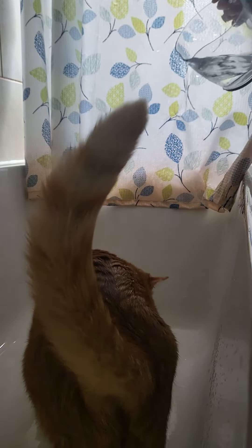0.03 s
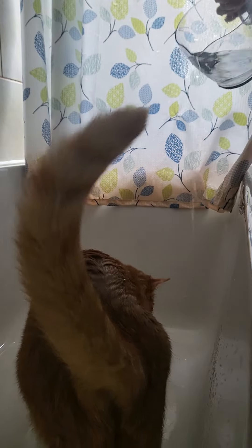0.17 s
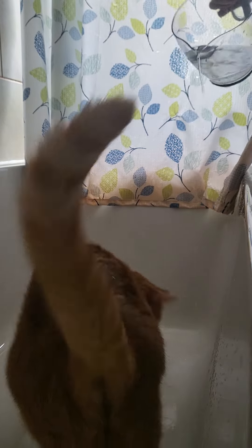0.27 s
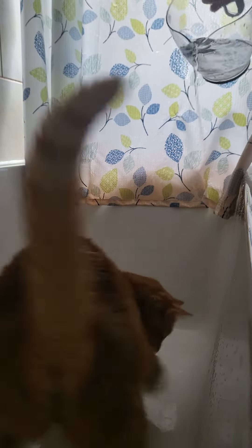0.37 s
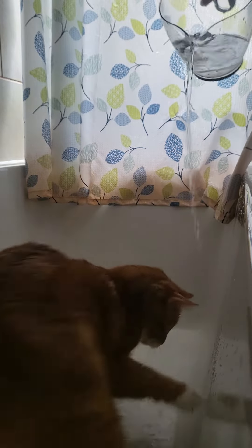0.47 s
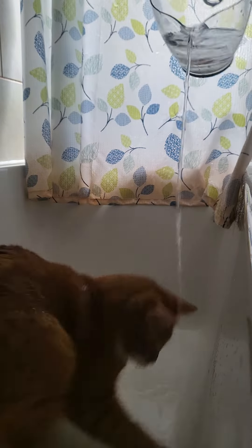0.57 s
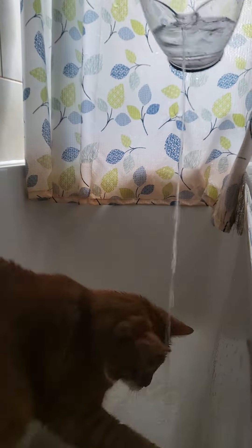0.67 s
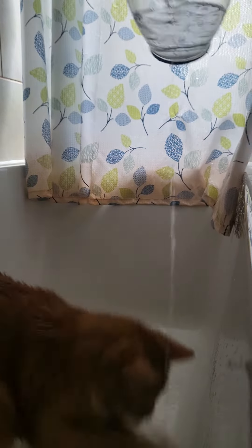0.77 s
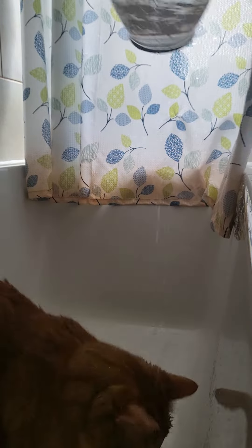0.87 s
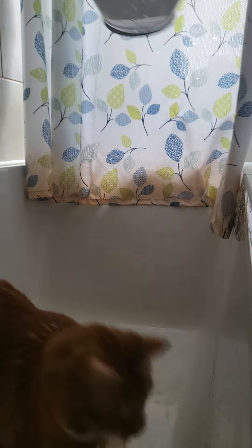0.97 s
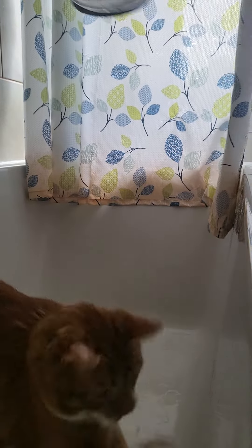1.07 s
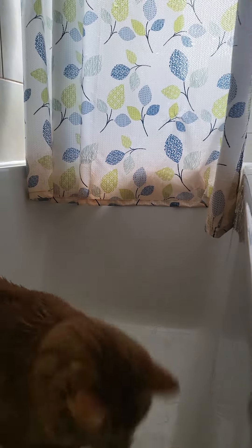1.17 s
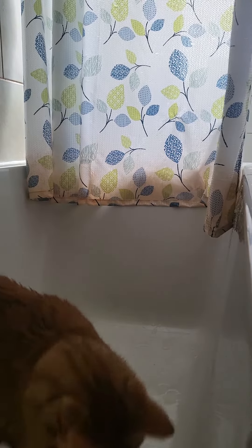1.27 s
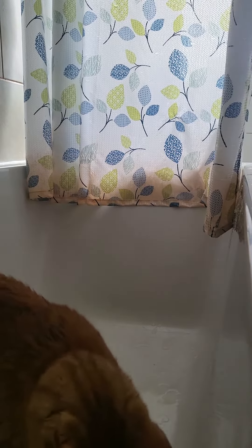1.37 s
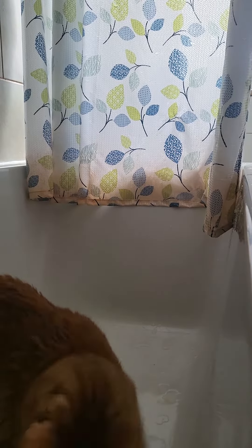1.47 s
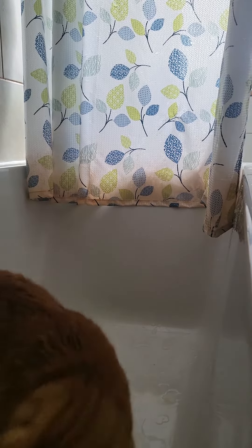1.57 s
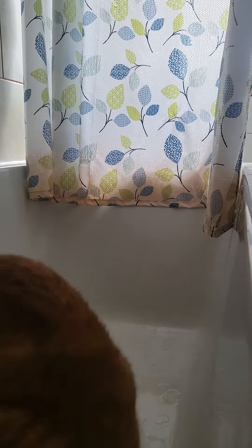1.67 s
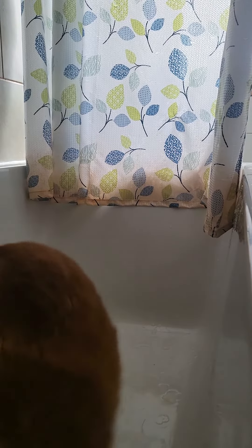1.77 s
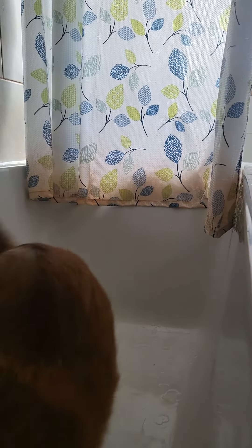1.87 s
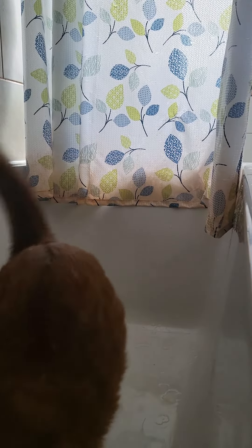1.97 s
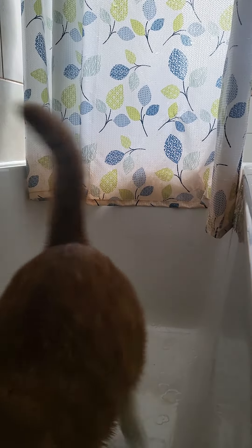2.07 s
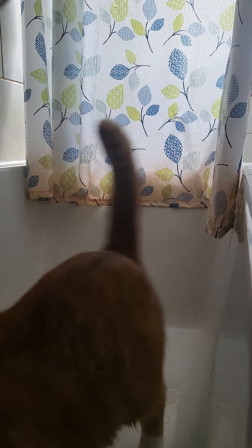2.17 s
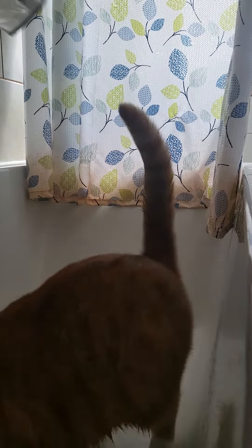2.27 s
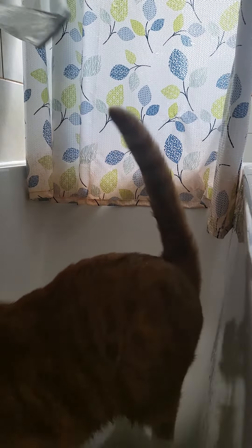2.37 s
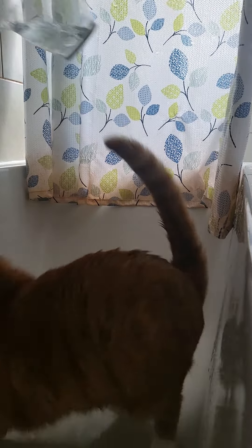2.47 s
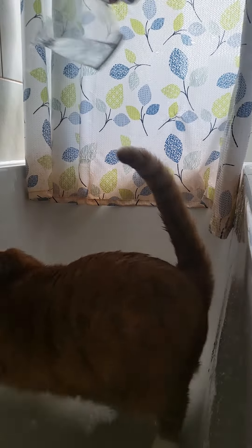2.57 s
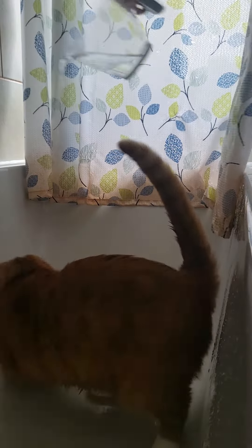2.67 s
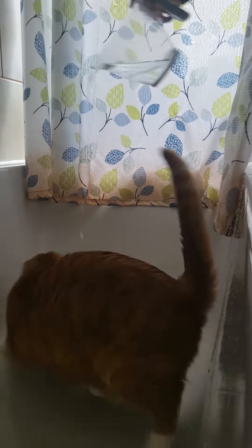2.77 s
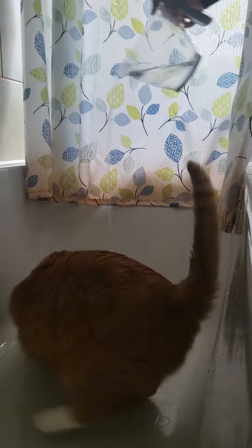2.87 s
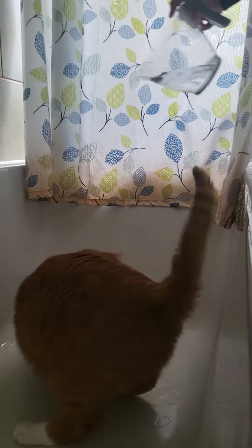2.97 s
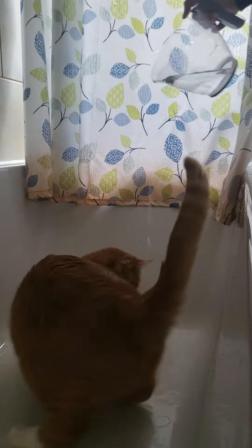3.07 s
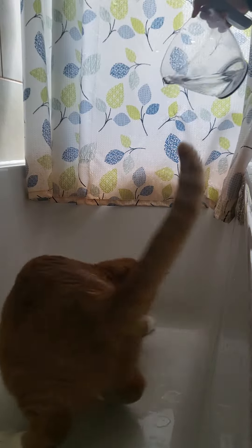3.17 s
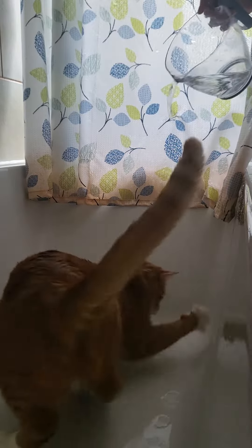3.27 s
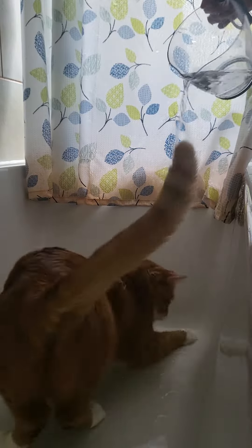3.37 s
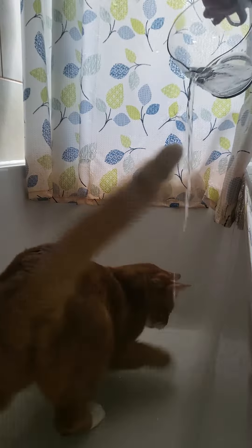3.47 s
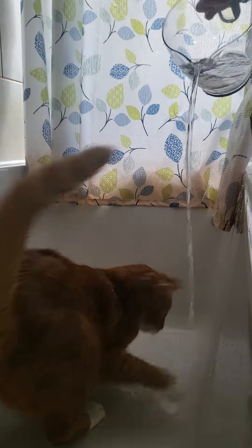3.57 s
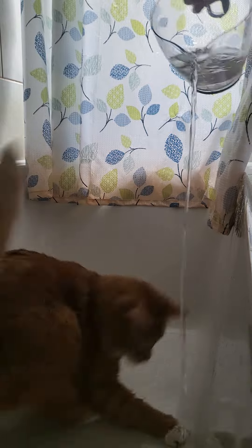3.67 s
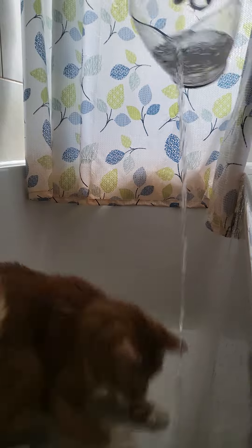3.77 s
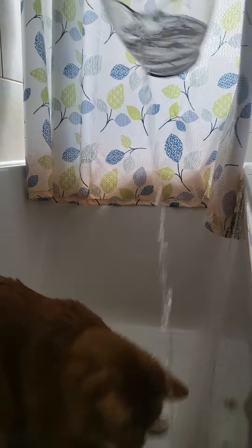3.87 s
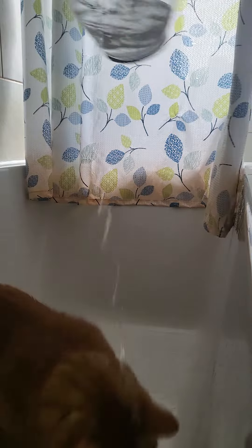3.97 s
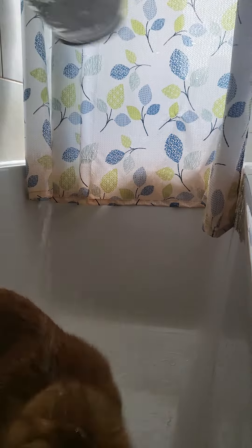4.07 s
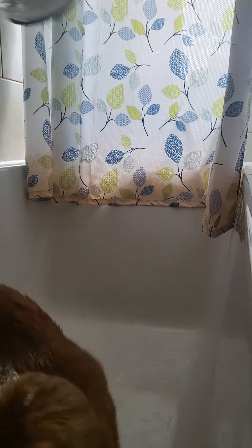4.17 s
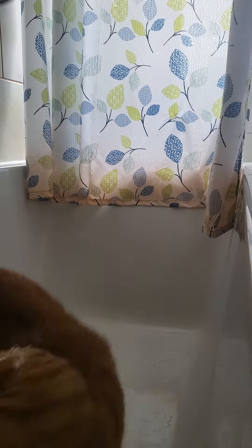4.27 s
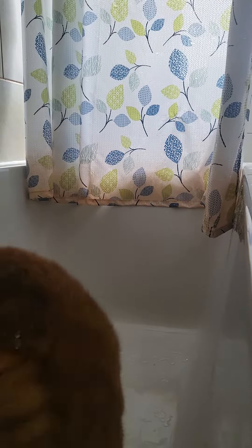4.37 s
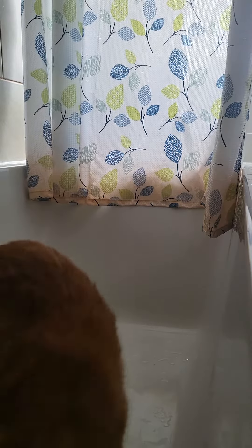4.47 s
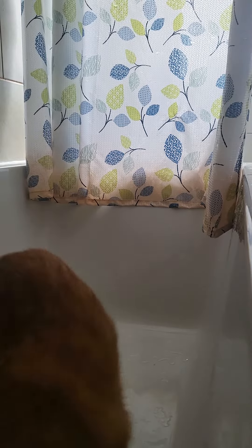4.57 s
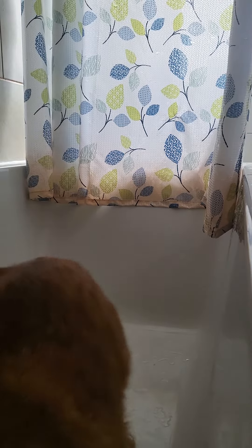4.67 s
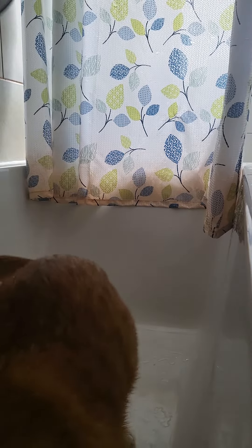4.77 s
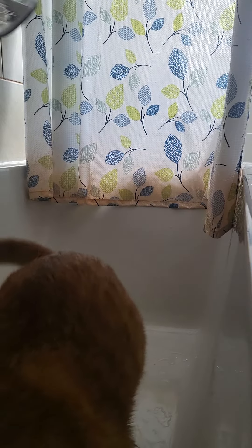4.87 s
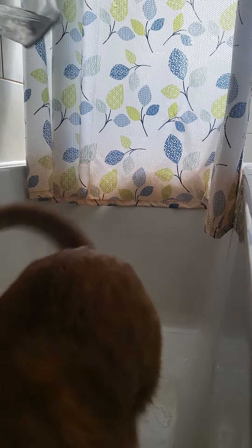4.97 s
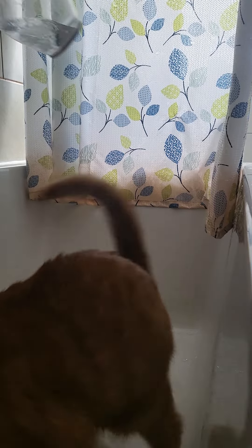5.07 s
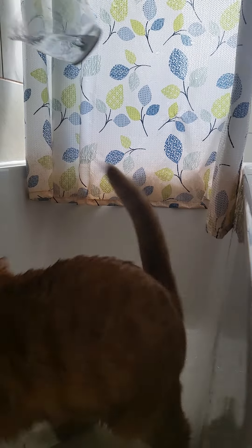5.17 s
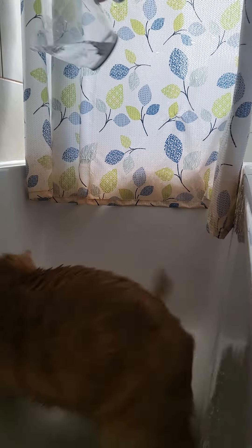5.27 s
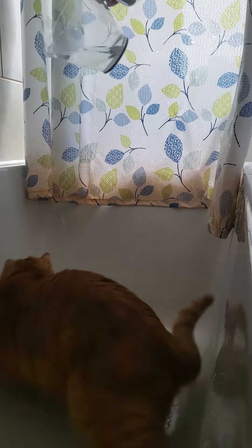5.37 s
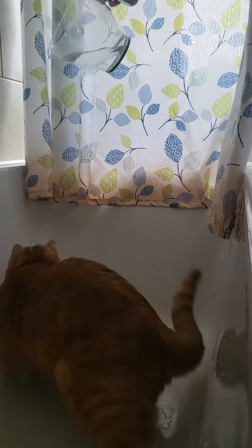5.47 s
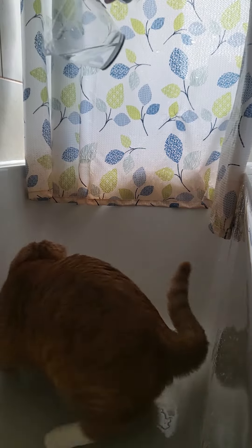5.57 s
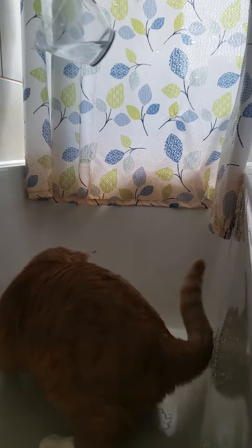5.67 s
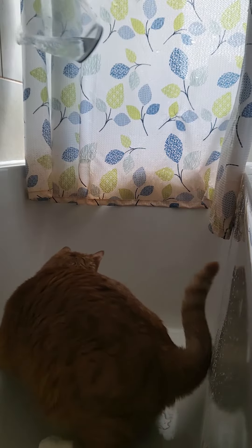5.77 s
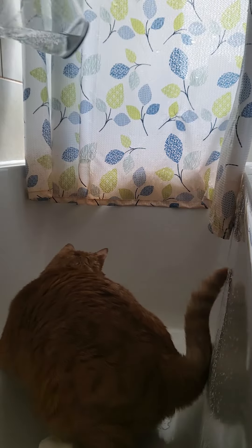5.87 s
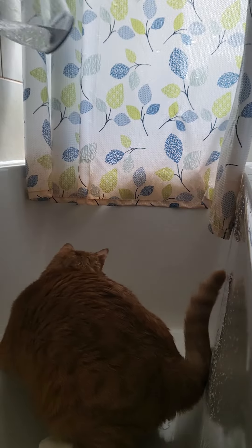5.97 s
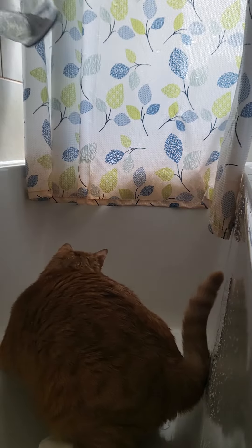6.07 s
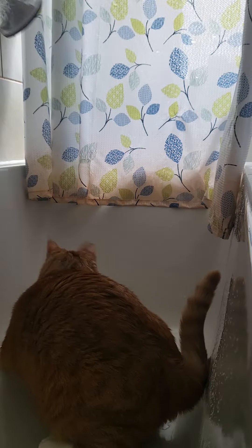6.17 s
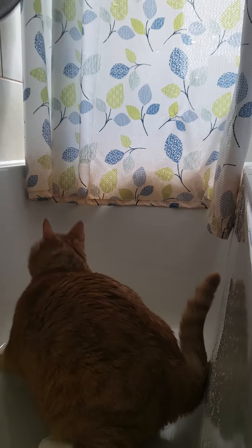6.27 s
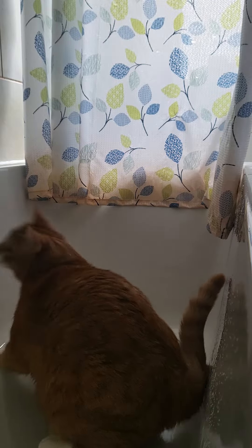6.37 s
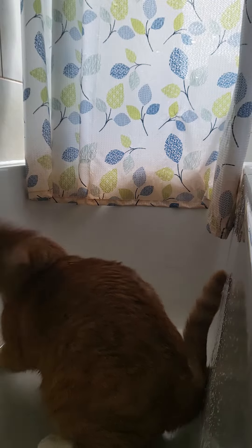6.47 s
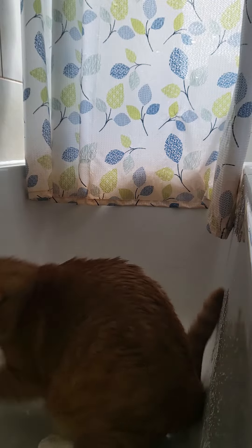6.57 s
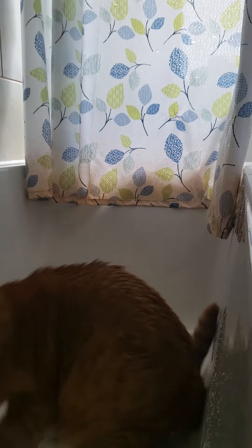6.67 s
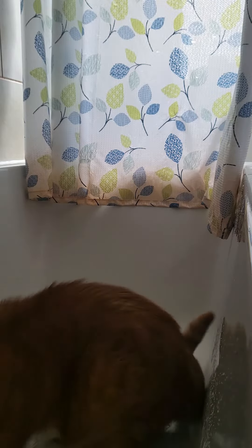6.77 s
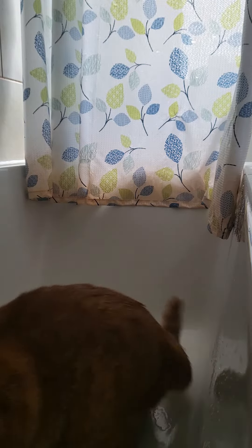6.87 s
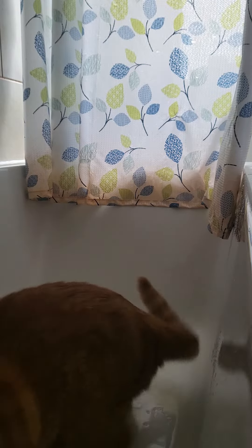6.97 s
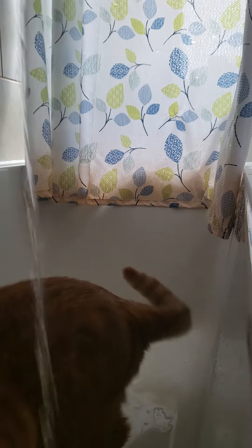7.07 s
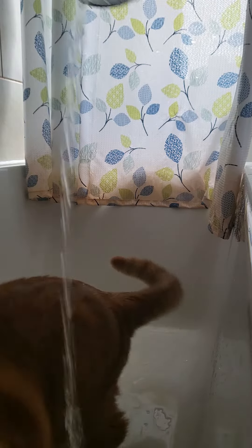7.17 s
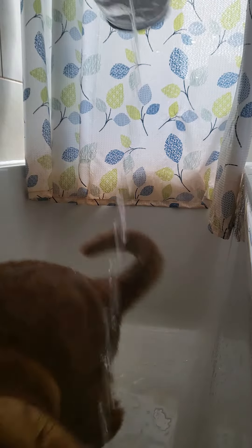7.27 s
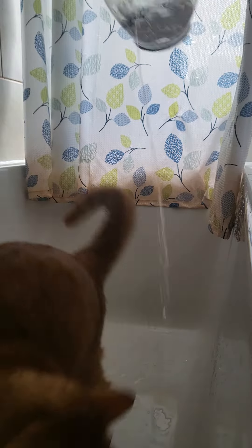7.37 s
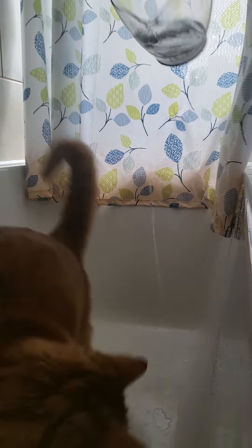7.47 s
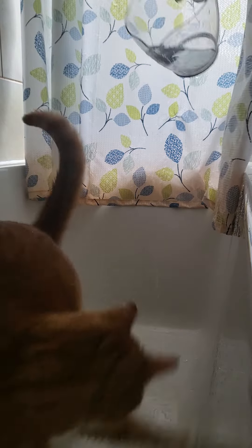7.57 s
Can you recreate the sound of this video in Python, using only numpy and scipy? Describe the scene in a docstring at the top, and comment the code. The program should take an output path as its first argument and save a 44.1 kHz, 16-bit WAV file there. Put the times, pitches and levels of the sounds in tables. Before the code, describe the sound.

Water spatters in brief bursts onto a wet bathtub floor while a cat's paws thump it, each hit ringing dull and hollow.

```python
"""Water is tipped from a glass into a bathtub in several short pours while a cat paws at the stream and treads about.
Slugs of water slap the wet floor as bursts of coloured noise; droplets tick and air pockets plop as short pings.
The hollow tub drums and booms under water and paws: decaying sine tones and dull noise.
The tiled alcove rings briefly through fading noise echoes; a faint hum and low air noise sit in the room."""
import sys
import numpy as np
from scipy import signal
from scipy.fft import rfft, irfft, next_fast_len
from scipy.io import wavfile
from scipy.ndimage import uniform_filter1d, map_coordinates

SR = 44100
rng = np.random.default_rng(int(sys.argv[2]) if len(sys.argv) > 2 else 0)


def dump(signal):
    """Clip the signal to [-1, 1] and save it as 16-bit WAV at the path in sys.argv[1]."""
    limited = np.clip(np.atleast_2d(signal).T, -1, 1)
    pcm = np.round(limited * 32767).astype(np.int16)
    wavfile.write(sys.argv[1], SR, pcm)


N = 336469  # length [samples]
T = np.arange(SR // 2) / SR  # time since a blow [s]
TOP_HZ = 16100  # nothing above this is kept

# Levels and balances in the tables are relative: the functions add their own gains.
# Room air noise: (frequency [Hz], level per Hz [dB])
AIR_SPECTRUM = [(12, -46.5), (20, -9.5), (63, 6), (158, -17.5), (172, -19.5), (187, -14.5), (270, -17),
                (319, -24), (399, -10.5), (434, -34), (472, -31), (850, -38), (1700, -47), (6500, -53),
                (10000, -45), (14500, -50), (16000, -52)]
# Steady hum tones: (frequency [Hz], rms level [dB])
HUM_TONES = [(70, -61), (394, -69.5)]
# How alike left and right are in diffuse sound: (frequency [Hz], likeness [0 to 1])
LIKENESS = [(60, .92), (110, 0.19), (200, .82), (380, 0.58), (700, 0.79), (1300, 0.064)]
# How long the tiled alcove rings: (frequency [Hz], time to fall 60 dB [s])
ALCOVE_DECAY = [(100, .4), (300, 0.32), (800, 0.15), (2000, 0.22), (5000, 0.24), (10000, 0.17),
                (16000, 0.17)]
LEFT_LEAD_S = 0.0004224  # direct sound reaches the left microphone this much before the right

# Single droplets that stand out of the patter: (time [s], peak level [dB], starting pitch [Hz])
DROPS = [(0.2344, -41.5, 9100), (0.2858, -45.5, 9300), (0.3392, -41.5, 4370), (0.4344, -37.5, 4190),
         (0.6235, -31, 4500), (0.6559, -34.5, 14400), (0.7233, -25, 10000), (0.9857, -51.5, 4450),
         (1.6347, -34.5, 6830), (1.6985, -29.5, 10700), (1.8131, -34, 5050), (2.1331, -33.5, 4500),
         (2.2223, -39.5, 6150), (2.2802, -38, 6300), (2.3984, -45, 3090), (2.7886, -33.5, 7250),
         (3.5404, -27, 7000), (3.5563, -25.5, 4900), (3.6187, -28.5, 6470), (4.0462, -37.5, 4500),
         (4.114, -36.5, 6900), (4.45, -50, 5600), (4.511, -39.5, 5600), (4.6503, -38, 2660),
         (4.6992, -32.5, 5600), (5.025, -35, 3300), (5.79, -60, 6000), (6.4268, -46, 13530),
         (6.4906, -41.5, 12100), (6.561, -46.5, 13600), (6.7211, -35.5, 14800), (6.7411, -30.5, 2920),
         (6.9591, -27, 3940), (7.2345, -28, 6300), (7.3652, -22.5, 11500), (7.43, -24, 11400)]
DROP_TILT = 3  # a droplet's tick brightens by this for each octave of its pitch [dB/octave]
# Stray droplets in running water: how many, peak over the spatter, and scatter of that peak
STRAY_PER_S, STRAY_DB, STRAY_SPREAD_DB = 9.8, 19, 4
STRAY_HZ, STRAY_OCTAVES = 5500, 0.68  # their middle pitch and its scatter

# Spells of running or dribbling water: (start [s], length [s], spatter [dB], splashing [dB],
# drumming on the tub [dB], fine hiss [dB])
RUNS = [(0.279, .09, -70, -69, -46, -75), (0.598, 0.23, -59, -57.5, -34.5, -61.5),
        (1.485, 0.12, -59, -59, -39, -55), (1.621, .15, -56.5, -53, -38, -52.5),
        (1.84, .2, -64.5, -66.5, -42.5, -68), (2.152, 0.17, -74.5, -71.5, -42.5, -76.5),
        (2.5, .1, -73, -79.5, -50, -77), (2.677, 0.23, -50, -53, -35, -53), (3.02, .27, -57, -56, -42, -61),
        (3.606, 0.29, -51, -47.5, -30, -52), (4.011, 0.2, -60.5, -57, -33.5, -65.5),
        (4.58, .09, -58, -54.5, -36, -62), (4.823, 0.119, -69, -70.5, -44, -75.5),
        (5.082, 0.25, -73.5, -59, -36.5, -77), (5.308, 0.16, -61.5, -50, -32, -74.5),
        (6.508, 0.1, -70, -58, -39.5, -56), (6.796, 0.42, -51, -47.5, -33, -50.5),
        (7.27, 0.22, -51.5, -47, -32.5, -52)]
RUN_ATTACK_S, RUN_SAG_DB_PER_S = 0.046, 8  # a run swells up to its start, then thins as it flows
# Time to fall 60 dB once the flow stops [s]
SPATTER_T60, SPLASHING_T60, DRUMMING_T60, HISS_T60 = 0.26, 0.32, 0.65, 0.35
SPURT_PER_S, SPURT_DB = 45, 2.5  # the falling stream breaks into uneven spurts: rate and scatter
# Bright spatter of drops: (frequency [Hz], level per Hz [dB])
SPATTER_SPECTRUM = [(900, -15.5), (2200, -7.5), (3300, -2.5), (4800, -2), (8000, -1), (10500, -1),
                    (13000, -4.5), (16000, -8)]
# Deeper splashing in the puddle: (frequency [Hz], level per Hz [dB])
SPLASHING_SPECTRUM = [(200, -33), (450, 11), (700, -2), (1100, -3.5), (1700, -11), (2500, -13.5),
                      (5000, -33), (16000, -65.5)]
# Finest spray: (frequency [Hz], level per Hz [dB])
HISS_SPECTRUM = [(3000, -29), (7000, -9), (10500, -0.5), (13000, -1), (16000, -3.5)]

# Paws treading on the tub, with no splash: (time [s], knock [dB], knock tilt [dB/octave], boom [dB])
STEPS = [(0.329, -49, 4.5, -42), (0.439, -42, 1, -45), (0.599, -26.5, -6.5, -35), (0.68, -28.5, -2.5, -35),
         (1.661, -23, -5.5, -37.5), (1.81, -30, -3, -23), (2.239, -28.5, 0, -40), (2.496, -34.5, 0, -37.5),
         (3.995, -16.5, -6.5, -22.5), (5.203, -28, -3, -34.5), (5.35, -22.5, 4, -37),
         (5.449, -27, 3, -27.5), (6.973, -25, 1, -35), (7.336, -21.5, 3.5, -35)]
# Modes (ringing tones) of the tub shell above its lowest one:
# (frequency [Hz], level [dB], time to fall 60 dB [s])
TUB_MODES = [(90.5, 2, 0.28), (114, 3.5, 0.3), (147, -0.5, 0.47), (159.5, -6.5, .25), (212, -12, 0.82),
             (267.8, -5.5, 0.27), (278.2, 2, 0.23), (348, -2.5, 0.16), (402.7, -7.5, .24),
             (443, -13.5, 0.18), (537, -15.5, 0.22)]
# Dull blur of the shell's weaker modes: (frequency [Hz], level per Hz [dB])
SHELL_SPECTRUM = [(30, -41.5), (80, 5.5), (120, 6.5), (200, 2), (290, -6.5), (420, -10), (600, -19),
                  (900, -25.5), (2000, -58.5), (6000, -100)]
BOOM_HZ, BOOM_T60 = 65.42, 0.54  # the tub floor flexing as a whole: pitch, time to fall 60 dB [s]
KNOCK_LAG_S = 0.003  # the tub gives way just after a splash

# Slugs of water and wet paws landing; each smacks, throws spray and shakes the tub:
# (time [s], left-right balance [dB], smack [dB], smack tilt [dB/octave], spray [dB],
# spray tilt [dB/octave], spray delay [s], knock [dB], knock tilt [dB/octave], boom [dB])
SPLASHES = [(0.555, -3.5, -32.5, 1.5, -65.5, 1.5, .001, -48, 9, -55),
            (0.581, 2, -30.5, 5, -31.5, -5, .001, -26, 1, -36),
            (0.793, -0.5, -18, 5, -22, -1, .001, -25.5, 4.5, -29),
            (0.835, 9, -34.5, -11, -46.5, -2, .001, -27.5, 5, -36.5),
            (1.314, -1.5, -31.5, 6, -39.5, -4, .004, -37.5, 7.5, -40),
            (1.433, -11, -29.5, -6.5, -48.5, 5, .001, -31, 1, -47),
            (1.58, 10.5, -32, 1, -50.5, 7.5, .001, -46, -4, -52),
            (1.773, -6, -39, 2.5, -43.5, 5, .001, -31.5, 2.5, -52),
            (2.025, -11, -41, 5.5, -46.5, -5.5, .001, -46, 5, -35.5),
            (2.627, 1, -20, -0.5, -29, 3, .001, -7, 0, -41),
            (2.651, -3.5, -19.5, -3, -35, -3.5, .004, -18.5, 3, -25.5),
            (2.827, -5.5, -24.5, 5.5, -29, -3.5, .004, -17.5, -3, -28),
            (2.897, -1.5, -28, 3.5, -32, -2, .001, -22, 0, -27.5),
            (3.007, 11, -22.5, 1.5, -59.5, -3, .001, -31, 10, -55),
            (3.156, 2, -21, -1.5, -40, 0, .001, -20, 3.5, -37),
            (3.331, 11, -27.5, 1.5, -33.5, -1.5, .014, -24, 0, -36),
            (3.635, 3, -20, -2.5, -31, -3, .013, -23.5, 0, -36),
            (3.783, 10.5, -26.5, -4, -31.5, 5, .001, -8, -0.5, -23),
            (3.832, -6, -15.5, 0, -41, -7, .001, -17.5, 3, -31),
            (3.974, 0, -14.5, 0.5, -30.5, -3, .001, -10, 4, -33),
            (4.153, -5.5, -22.5, 4, -38, 3, .008, -23, 1.5, -27),
            (5.285, 0, -27.5, -1, -33, 2.5, .001, -14, -0.5, -30),
            (5.321, -4, -28, 8, -30, 2, .007, -36, 8, -36.5),
            (6.79, 4.5, -25, 4.5, -25, 5, .003, -14.5, -4, -18.5),
            (6.842, 6.5, -51, -5, -26.5, 0.5, .002, -20, -8, -29),
            (7.106, 9.5, -20, 1, -34, 2.5, .001, -34, -6, -30),
            (7.117, 0.5, -20, -8, -30, 2, .001, -18.5, -14, -27.5),
            (7.305, -4, -26.5, 3, -28, 1, .013, -28, 1, -48),
            (7.562, 9.5, -12, -3, -43.5, -1, .001, -18.5, -1, -32),
            (7.592, 3, -28, -4, -39.5, -4, .001, -32, -12, -43)]
# Hollow smack of water on the floor: (frequency [Hz], level per Hz [dB])
SLAP_SPECTRUM = [(150, -24), (400, 3.5), (700, 1), (1100, 2), (1400, 1.5), (1800, -7.5), (2200, -14),
                 (3200, -19.5), (6000, -26.5), (16000, -53)]
# Bright spray thrown by a slug: (frequency [Hz], level per Hz [dB])
SPRAY_SPECTRUM = [(700, -31), (1800, 0), (2800, 2.5), (4800, 0), (6500, -3), (8200, -9), (10000, -6),
                  (13000, -13), (16000, -20.5)]
# A slug's front: head start [s], level against its spray, time to fall 60 dB [s]
LEAD_S, LEAD_DB, LEAD_T60 = 0.0092, -10, 0.025
# Droplets flung up by a splash land again: rate, level against the spray, time to fall 60 dB [s]
REBOUND_PER_S, REBOUND_DB, REBOUND_T60 = 70, -17.5, 0.21
# The largest air pockets gulping in the water: (time [s], level [dB], starting pitch [Hz])
GLUGS = [(0.585, -31, 1680), (0.796, -20, 1780), (1.432, -39, 1370), (3.014, -28, 230), (3.654, -27, 1750),
         (3.854, -23.5, 548), (3.9734, -23, 1550), (3.801, -26.5, 370), (4.6, -43.5, 1890),
         (4.925, -54, 1330), (5.322, -31, 876), (5.37, -28, 354), (5.401, -31.5, 457), (5.447, -35.5, 610),
         (6.98, -38, 403), (7.15, -36, 697), (7.352, -36, 426)]


def amp(db):
    """Decibels to gain."""
    return 10 ** (np.asarray(db) / 20)


def unit(x):
    """Scaled to rms (average strength) 1."""
    return x / np.sqrt(np.mean(x ** 2) + 1e-20)


def crest(x, size):
    """Scaled so that the loudest stretch of size samples has rms 1."""
    power = np.mean(np.atleast_2d(x) ** 2, axis=0)
    return x / np.sqrt(uniform_filter1d(power, size).max() + 1e-20)


def along(points, hz):
    """(Hz, value) points joined by lines on a log frequency axis."""
    f, v = np.transpose(points)
    return np.interp(np.log(hz + 1), np.log(f), v)


def fade(t, t60):
    """Exponential decay that falls 60 dB in t60 seconds."""
    return np.exp(-np.log(1000) * t / t60)


def sides(db):
    """Left and right gains for a level difference; positive means louder on the left."""
    return amp(np.array([[db], [-db]]) / 2)


def add(track, s, sound):
    """Mix a sound in at time s."""
    part = track[..., max(round(s * SR), 0):][..., :sound.shape[-1]]
    part += sound[..., :part.shape[-1]]


def filtered(x, response):
    """x with its spectrum multiplied by a response of frequency."""
    n = x.shape[-1]
    m = 2 * next_fast_len(n // 2 + n // 16 + 512)  # spare room for the filter's ringing
    hz = np.fft.rfftfreq(m, 1 / SR)
    return irfft(rfft(x, m) * response(hz), m)[..., :n]


def coloured(x, spectrum):
    """x shaped to a spectrum by a filter of unit power gain that never sounds early."""
    def response(hz):
        # folding the cepstrum gives the filter with the least delay (minimum phase)
        cepstrum = irfft(np.log(unit(amp(along(spectrum, hz)))))
        half = len(cepstrum) // 2
        cepstrum[1:half] *= 2
        cepstrum[half + 1:] = 0
        return np.exp(rfft(cepstrum))
    return filtered(x, response)


def tilted(spectrum, tilt_db, pivot_hz):
    """A spectrum brighter or duller by tilt_db an octave, up to two octaves from the pivot."""
    return [(hz, db + tilt_db * np.clip(np.log2(hz / pivot_hz), -2, 2)) for hz, db in spectrum]


def diffuse(pair):
    """Two unrelated signals become left and right, as alike at each pitch as LIKENESS says."""
    def mid_side_gains(hz):
        turn = np.arccos(np.clip(along(LIKENESS, hz), 0, 1)) / 2
        return np.array([np.cos(turn), np.sin(turn)])
    mid, side = filtered(pair, mid_side_gains)
    return np.array([mid + side, mid - side])


def direct(x, pan_db):
    """A sound from the tub floor as two microphones hear it: the left one first."""
    ear = np.array([[1], [-1]])
    return sides(pan_db) * filtered(x, lambda hz: np.exp(1j * np.pi * hz * LEFT_LEAD_S * ear))


def impacts(rate, spread_db):
    """Randomly timed impulses of uneven size and random sign, rms 1."""
    hit = rng.random(N) < rate / SR
    size = amp(spread_db * np.minimum(rng.standard_normal(N), 2))
    return unit(hit * size * rng.choice([-1, 1], N))


def room_tone():
    """Low air noise and a faint hum whose phase wanders slightly."""
    t = np.arange(N) / SR
    drift = map_coordinates(rng.standard_normal(N // SR * 8 + 16), [t * 8])  # 8 random points a second
    hum = sum(amp(db) * unit(np.sin(2 * np.pi * hz * t + 0.9 * drift)) for hz, db in HUM_TONES)
    air = unit(coloured(diffuse(rng.standard_normal((2, N))), AIR_SPECTRUM))
    return (hum + amp(-53) * air) * sides(3.2)


def bubble(t, hz, cycles, glide):
    """A bubble swells, falls 60 dB within some cycles and rises in pitch as it surfaces."""
    life = cycles / hz
    age = np.minimum(t / life, 2)
    tone = np.sin(2 * np.pi * cycles * age * (1 + glide * age / 2))
    return tone * (1 - np.exp(-age / 0.12)) * fade(t, life)


def drops(rows):
    """A droplet pats the enamel, bursts with a tick and tiny bubble, then its fragments land; high ones are brighter."""
    out, pats, t = np.zeros(N), np.zeros(N), T[:SR // 16]
    for s, db, hz in rows:
        colour = tilted(SPATTER_SPECTRUM, DROP_TILT * np.log2(hz / STRAY_HZ), pivot_hz=STRAY_HZ)
        ping = crest(bubble(t, hz, cycles=8, glide=0.13), size=64)
        tick = crest(rng.standard_normal(len(t)) * fade(t, t60=0.006), size=64)
        # cubed noise is sparse and spiky, like many small landings
        fragments = crest(rng.standard_normal(len(t)) ** 3 * fade(t, t60=0.1), size=64)
        add(out, s, amp(db - 9.5) * (ping + coloured(tick + amp(-11) * fragments, colour)))
        add(pats, s, amp(db - 18) * tick)
    return out + coloured(pats, SLAP_SPECTRUM)


def tail():
    """A fresh stereo echo of tiles and tub walls: noise that fades at its own rate at each pitch, left energy 1."""
    hz, t, z = signal.stft(diffuse(rng.standard_normal((2, SR // 3))), SR, nperseg=256)
    faded = z * fade(t, along(ALCOVE_DECAY, hz)[:, None])
    pair = signal.istft(faded, SR, nperseg=256)[1]
    pair = pair * (1 - np.exp(-T[:pair.shape[1]] / 0.00076))  # soft onset
    return pair / np.linalg.norm(pair[0])


def alcove(x, count=24):
    """The walls' echo, drawn afresh for each of count equal stretches as the splashes wander."""
    out = np.zeros((2, N))
    for span in np.array_split(np.arange(N), count):
        add(out, span[0] / SR, signal.fftconvolve(x[None, span], tail(), axes=1))
    return out


def flow(column, t60):
    """Strength of one part of the running water: every run swells, sags and dies away."""
    t, power = np.arange(N) / SR, np.zeros(N)
    for start, length, *levels_db in RUNS:
        age = t - start
        swell = np.exp(-np.clip(age / RUN_ATTACK_S, -10, 0) ** 2)
        sag_db = RUN_SAG_DB_PER_S * np.clip(age, 0, length)
        release = fade(np.maximum(age - length, 0), t60)
        power += (amp(levels_db[column] - sag_db) * swell * release) ** 2
    return np.sqrt(power)


def spurts():
    """Quick random swings of the flow, as a gain of rms 1."""
    knots = rng.standard_normal(N // 100)
    swing = map_coordinates(knots, [np.arange(N) * SPURT_PER_S / SR], order=1)
    return unit(amp(SPURT_DB * np.clip(swing, -2, 2)))


def strays(spatter):
    """Random droplets whose level follows the spatter they fall in: rows like DROPS."""
    count = int(STRAY_PER_S * N / SR)
    when = (np.arange(count) + rng.random(count)) / count * (N - 1)  # [samples]
    size, pitch = np.clip(rng.standard_normal((count, 2)), -2, 2).T
    spatter_db = 20 * np.log10(spatter[when.astype(int)] + 1e-9)
    db = spatter_db + STRAY_DB + STRAY_SPREAD_DB * size
    hz = np.minimum(STRAY_HZ * 2 ** (STRAY_OCTAVES * pitch), TOP_HZ)
    return list(zip(when / SR, db, hz))


def froth(rate, pitch_hz, octaves, cycles, spread_db, size):
    """A crowd of bubbles of scattered pitch, strength and length, rms 1."""
    chance = rng.random((int(rate * N / SR), 4))  # columns: time, pitch, strength, length

    def bell(u):  # turns even chances into a bell-shaped scatter
        return np.log((u + 0.02) / (1.02 - u)) / 1.7

    hz = np.clip(pitch_hz * 2 ** (octaves * bell(chance[:, 1:2])), 100, 15000)
    ringing = bubble(np.arange(size) / SR, hz, cycles * (0.5 + chance[:, 3:]), glide=0.71)
    grains = amp(spread_db * bell(chance[:, 2:3])) * ringing
    where = (chance[:, :1] * N).astype(int) + np.arange(size)
    return unit(np.bincount(where.ravel(), grains.ravel(), N)[:N])


def tub_response(hz, boom_db=8):
    """The tub's modes as a filter: each one is a resonance, wider the faster it dies."""
    total = 0
    for k, (f, db, t60) in enumerate([(BOOM_HZ, boom_db, BOOM_T60)] + list(TUB_MODES)):
        damping = 1j * hz * np.log(1000) / (np.pi * t60)
        total = total + (-1) ** k * amp(db) * damping / (f * f - hz * hz + damping)
    return total


def stream(spatter, splashing, drumming):
    """The stream breaks into drops that spatter, bubble in the puddle and drum on the tub: (wet sound, drumming)."""
    mist = np.array([impacts(rate=1500, spread_db=-2.5), impacts(rate=1700, spread_db=-0.5)])
    beads = impacts(rate=76, spread_db=19.0)
    blobs = impacts(rate=260, spread_db=5.0)
    fizz = froth(rate=180, pitch_hz=6400, octaves=0.7, cycles=15, spread_db=3, size=500)
    bubbles = froth(rate=77, pitch_hz=921, octaves=0.5, cycles=8.7, spread_db=5.5, size=1600)
    fine = coloured(amp(-11.5) * mist[0] + amp(-12.5) * beads, SPATTER_SPECTRUM) + amp(-7.5) * fizz
    body = coloured(amp(-4) * blobs + amp(-6.5) * mist[1], SPLASHING_SPECTRUM) + amp(-4.5) * bubbles
    ring = unit(filtered(blobs, tub_response))
    blur = unit(coloured(diffuse(mist), SHELL_SPECTRUM))
    wet = spatter * fine + splashing * body
    drum = drumming * (amp(-6.0) * ring + amp(-8.5) * blur) * sides(1)
    return wet, drum


def fine_spray(strength):
    """The finest droplets prickle on the wet enamel."""
    return strength * amp(-5) * coloured(impacts(rate=260, spread_db=7), HISS_SPECTRUM)


def blows():
    """Everything that shakes the tub, splashes and steps: rows like STEPS."""
    splashes = [(s + KNOCK_LAG_S, knock_db, tilt, boom_db) for s, *_, knock_db, tilt, boom_db in SPLASHES]
    return splashes + list(STEPS)


def thuds():
    """Each blow rings the tub's modes at new strengths, with its tilt favouring low or high; the floor booms on."""
    out = np.zeros((2, N))
    hz, mode_db, t60 = np.transpose(TUB_MODES)[:, :, None]
    swell = 1 - np.exp(-T / 0.0041)
    modes = swell * np.sin(2 * np.pi * hz * T) * fade(T, t60)
    boom = np.sin(2 * np.pi * BOOM_HZ * T) * fade(T, BOOM_T60) * (1 - np.exp(-T / 0.015))
    boom = crest(boom, size=1024)
    for s, knock_db, tilt, boom_db in blows():
        scatter_db = 2 * rng.standard_normal(hz.shape)
        strength = amp(mode_db + tilt * np.log2(hz / 250) + scatter_db)
        ring = crest(np.sum(strength * rng.choice([-1, 1], hz.shape) * modes, axis=0), size=512)
        # the crowd of weaker modes blurs into a dull rumble
        rumble = diffuse(rng.standard_normal((2, len(T)))) * swell * fade(T, t60=0.18)
        blur = crest(coloured(rumble, tilted(SHELL_SPECTRUM, tilt, pivot_hz=250)), size=512)
        knock = crest(ring + blur, size=2048)
        add(out, s, amp(knock_db - 8.5) * knock + amp(boom_db - 1.0) * boom)
    return out * sides(3.0)


def rebound():
    """A slug's ragged front hisses just ahead of it; droplets that it flings up crackle as they land."""
    front, flung = np.zeros(N), np.zeros(N)
    for s, _, _, _, spray_db, _, delay, *_ in SPLASHES:
        front_shape = (1 - np.exp(-T / LEAD_S)) * fade(T, LEAD_T60)
        add(front, s - LEAD_S, amp(spray_db + LEAD_DB) * front_shape)
        add(flung, s + delay, amp(spray_db + REBOUND_DB) * fade(T, REBOUND_T60))
    hiss = coloured(front * rng.standard_normal(N), SPRAY_SPECTRUM)
    return hiss + flung * coloured(impacts(rate=REBOUND_PER_S, spread_db=7.5), SPATTER_SPECTRUM)


def burst(spectrum, rise, t60, pan_db, room_db):
    """A sheet of water tearing: a short ragged crack and its wash in the alcove."""
    wash = tail()
    t = T[:wash.shape[1]]
    ragged = amp(4 * unit(uniform_filter1d(rng.standard_normal(len(t)), size=32)))  # 4 dB swings
    shape = (1 - np.exp(-t / rise)) ** 2 * fade(t, t60)
    crack = crest(coloured(shape * ragged * rng.standard_normal(len(t)), spectrum), size=128)
    echo = amp(room_db) * np.linalg.norm(crack) * coloured(wash, spectrum)
    return direct(crack, pan_db) + echo


def slaps():
    """Each slug lands with a hollow smack and throws bright spray; the left microphone gets more of the treble."""
    out = np.zeros((2, N))
    for s, pan_db, smack_db, smack_tilt, spray_db, spray_tilt, delay, *_ in SPLASHES:
        smack_colour = tilted(SLAP_SPECTRUM, smack_tilt, pivot_hz=1069)
        spray_colour = tilted(SPRAY_SPECTRUM, spray_tilt, pivot_hz=5000)
        smack = burst(smack_colour, rise=0.0013, t60=0.022, pan_db=pan_db - 6.0, room_db=1.0)
        spray = burst(spray_colour, rise=0.0023, t60=0.01, pan_db=pan_db + 13.5, room_db=4.0)
        add(out, s, amp(smack_db - 7.5) * smack)
        add(out, s + delay, amp(spray_db - 4.5) * spray)
    return out


def fallout():
    """Water thrown up by each slap falls back and traps bubbles, large from the smack and tiny from the spray."""
    thrown = np.zeros((2, N))
    shape = (1 - np.exp(-T / 0.0036)) * fade(T, t60=0.18)
    for s, _, smack_db, _, spray_db, *_ in SPLASHES:
        add(thrown, s, amp([[smack_db], [spray_db]]) * shape)
    large = froth(rate=170, pitch_hz=930, octaves=0.5, cycles=8.3, spread_db=5, size=1600)
    tiny = froth(rate=240, pitch_hz=5160, octaves=0.7, cycles=16, spread_db=8, size=500)
    return amp(-19.0) * thrown[0] * large + amp(-13.5) * thrown[1] * tiny


def glugs():
    """Larger air pockets plop: single bubbles that ring lower than most droplets."""
    out = np.zeros(N)
    for s, db, hz in GLUGS:
        plop = crest(bubble(T[:SR // 8], hz, cycles=15, glide=0.034), size=128)
        add(out, s, amp(db - 4.5) * plop)
    return out


def scene():
    """Water and tub in the alcove, over the room tone."""
    releases = [SPATTER_T60, SPLASHING_T60, DRUMMING_T60, HISS_T60]
    uneven = spurts()
    spatter, splashing, drumming, hiss = (uneven * flow(k, t60) for k, t60 in enumerate(releases))
    patter, drum = stream(spatter, splashing, drumming)
    ticks = drops(list(DROPS) + strays(spatter)) + fine_spray(hiss) + rebound()
    plops = glugs() + fallout()
    near = direct(ticks, pan_db=10.5) + direct(patter, pan_db=6) + direct(plops, pan_db=4.0)
    echo = amp(2.5) * alcove(ticks + patter + plops) * sides(0.45)
    return slaps() + near + echo + thuds() + drum + room_tone()


def record(dry):
    """Everything from TOP_HZ up is cut away."""
    return filtered(dry, lambda hz: hz < TOP_HZ)


dry = scene()
out = record(dry)
dump(out)
```